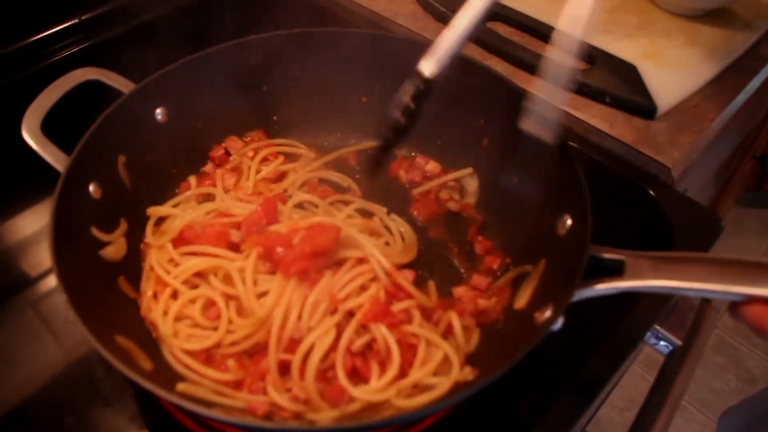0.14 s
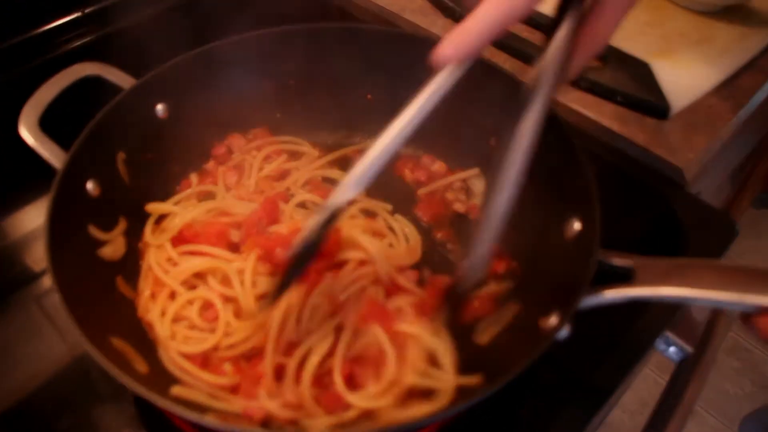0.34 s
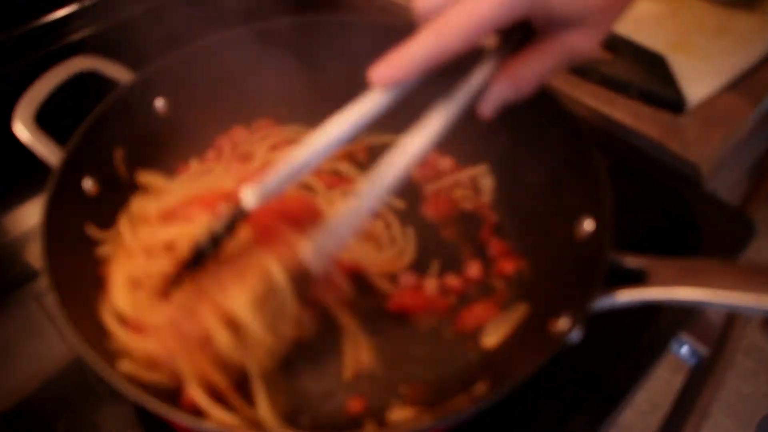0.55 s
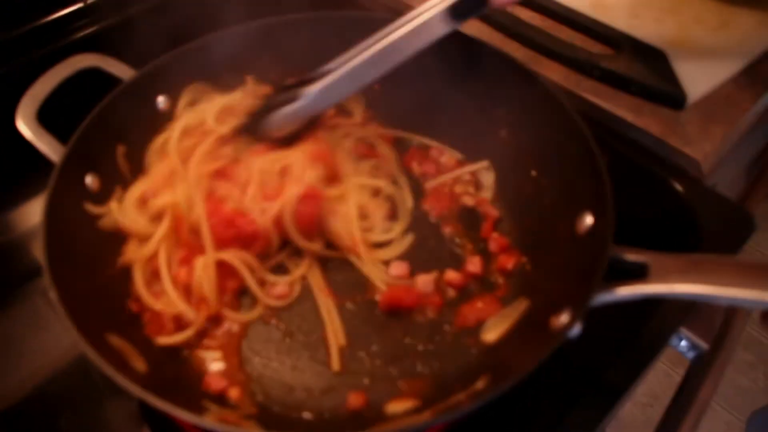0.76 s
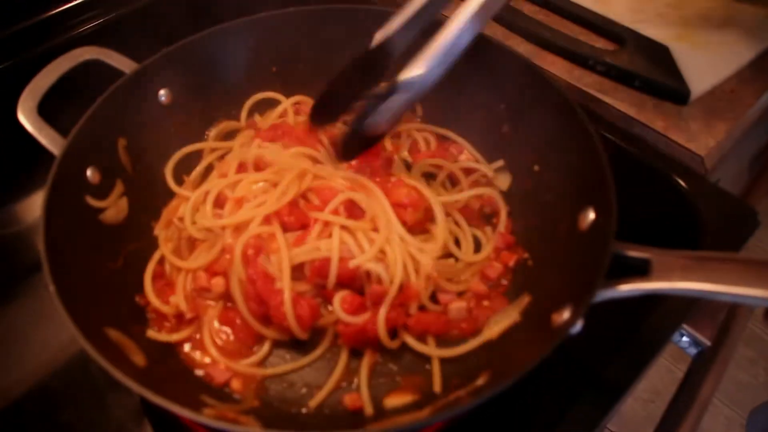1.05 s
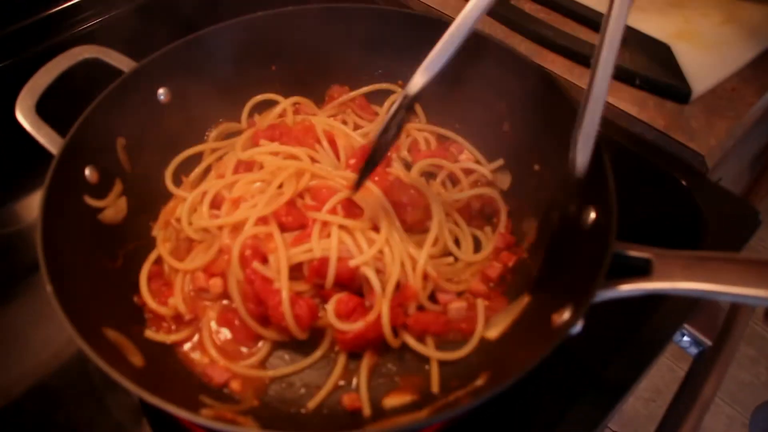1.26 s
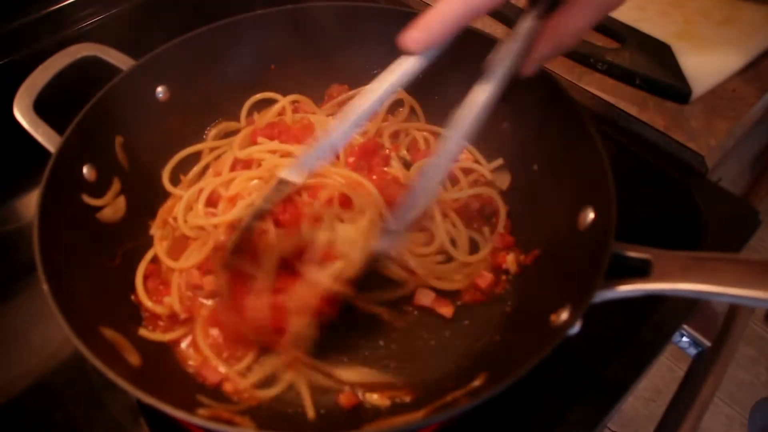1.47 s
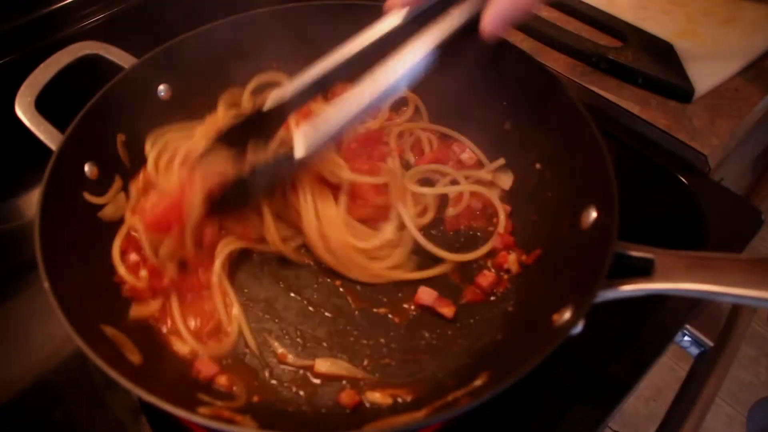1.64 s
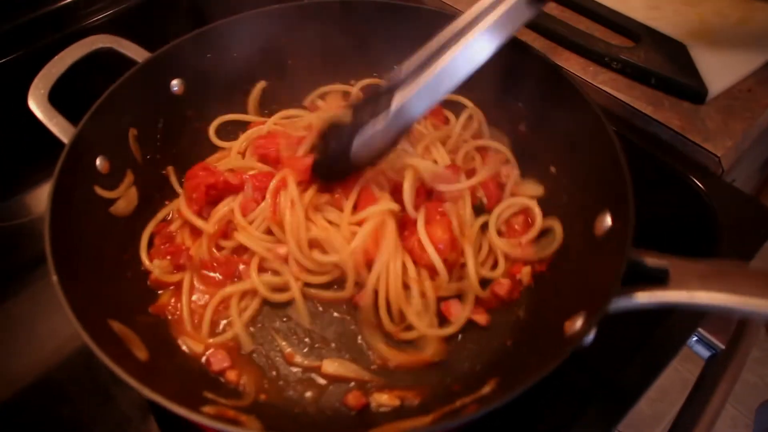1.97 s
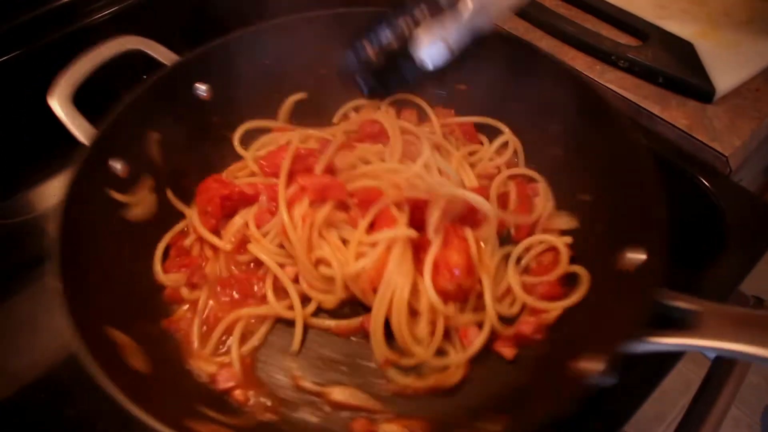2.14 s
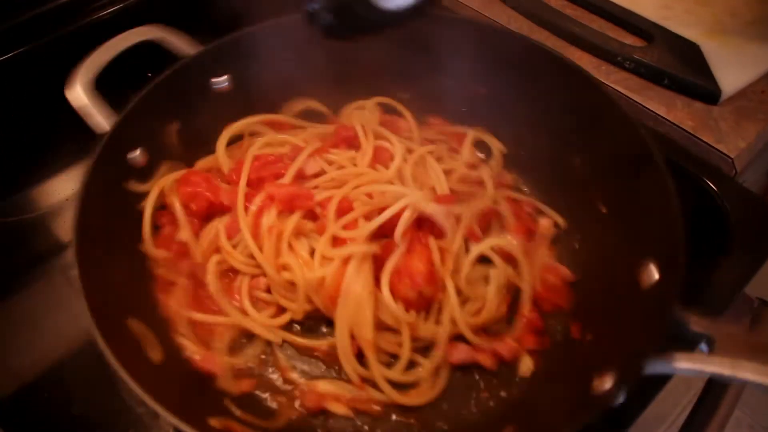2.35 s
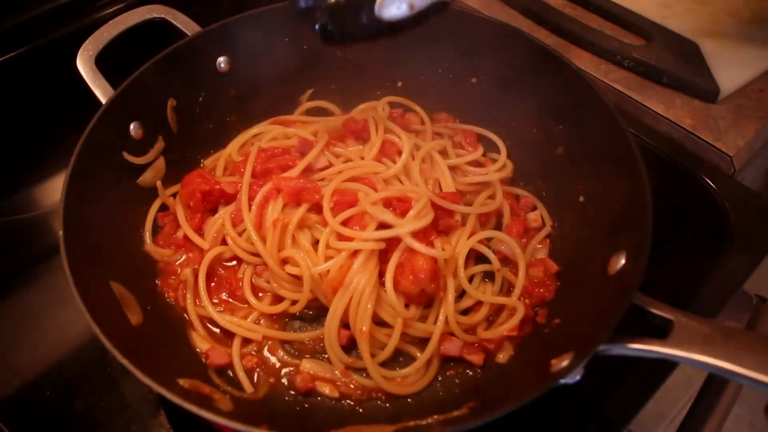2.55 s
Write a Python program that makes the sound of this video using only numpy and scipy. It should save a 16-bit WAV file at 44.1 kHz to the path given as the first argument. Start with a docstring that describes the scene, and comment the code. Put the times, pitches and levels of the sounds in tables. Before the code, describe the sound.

Close above a stove in a small kitchen, tongs strike a pan twice with bright metallic rings, wet spaghetti squelches between, and finally the heavy skillet is shoved, scraping and thumping down over faint sizzling.

```python
"""A small kitchen: steel tongs toss spaghetti in a skillet, over a faint steady sizzle and a low rumble.
Twice the tongs clank on the pan and rebound (hard clacks plus decaying steel modes), then dig into the
wet pasta (sticky grains, soft thuds, wet pops). The skillet is then shoved to and fro over the hob,
scraping (dense slips through the resonances of its base), and knocks back down (dead, coloured blows)."""
import sys
import numpy as np
from scipy import signal
from scipy.fft import rfft, irfft, next_fast_len
from scipy.io import wavfile
from scipy.ndimage import uniform_filter1d

SR = 44100
rng = np.random.default_rng(int(sys.argv[2]) if len(sys.argv) > 2 else 0)


def to_wav(sig):
    """Store sig (one row per channel, or 1-D mono) as 16-bit WAV at the path in sys.argv[1].

    Samples outside -1..1 are clipped; the rate is SR.
    """
    pcm = np.clip(np.atleast_2d(sig), -1, 1) * 32767
    pcm = np.round(pcm).astype(np.int16)
    wavfile.write(sys.argv[1], SR, pcm.T)  # frames by channels


N = 119070


def amp(db):
    """Decibels to gain."""
    return 10 ** (np.asarray(db) / 20)


def unit(x):
    """Scale x to rms 1."""
    return x / np.sqrt(np.mean(x ** 2) + 1e-20)


def along(points, hz):
    """Read a curve of (frequency, value) points on a log frequency axis."""
    f, values = np.transpose(points)
    return np.interp(np.log(hz + 1), np.log(f + 1), values)


def level(points):
    """A gain per sample from (time, level) points, straight in dB."""
    return amp(np.interp(np.arange(N) / SR, *np.transpose(points)))


def coloured(x, shape):
    """Filter x through a curve of dB over frequency, then scale it to rms 1."""
    gain = amp(shape(np.fft.rfftfreq(N, 1 / SR)))
    return unit(irfft(rfft(x) * gain, N))


def noise(spectrum):
    """Noise of a given spectrum."""
    return coloured(rng.standard_normal(N), lambda hz: along(spectrum, hz))


def grains(rate, spread_db):
    """Random tiny impulses of uneven size and either sign, about `rate` a second."""
    hits = rng.random(N) < rate / SR
    signs = rng.choice([-1, 1], N)
    sizes = amp(spread_db * np.clip(rng.standard_normal(N), -2, 2))
    return unit(hits * signs * sizes)


def fade(t60):
    """An exponential decay that falls 60 dB in t60 seconds."""
    return np.exp(-np.log(1000) * np.arange(N) / SR / t60)


def at(s, x):
    """Delay x to start at s seconds."""
    return np.pad(x, (max(round(s * SR), 0), 0))[:N]


def swelling(hz, t60, swell_s):
    """A note that builds up, then dies away."""
    t = np.arange(N) / SR
    return fade(t60) * (1 - np.exp(-t / swell_s)) * np.sin(2 * np.pi * hz * t)


def patchy(x, depth_db):
    """Give x a gain that wanders in time and frequency."""
    cells = signal.stft(x, nperseg=256)[2]
    field = rng.standard_normal(cells.shape)
    field = uniform_filter1d(field, size=3, axis=0)  # smooth over frequency
    field = uniform_filter1d(field, size=7, axis=1)  # smooth over time
    return unit(signal.istft(cells * amp(depth_db * unit(field)))[1][:N])


# reverberation time of the kitchen: (frequency [Hz], t60 [s])
ROOM_DECAY = [(100, 0.41), (400, 0.45), (1500, 0.52), (5000, 0.55), (9000, 0.26), (15000, 0.31)]
# tone of the reverberation: (frequency [Hz], level [dB])
ROOM_TONE = [(100, 5.5), (3000, -0.5), (6000, -3.5), (16000, -5.5)]


def kitchen(x, room_db):
    """Add reverberation: noise that decays at each frequency's own rate, high treble sooner than the rest."""
    hz, t, cells = signal.stft(rng.standard_normal(SR), SR, nperseg=256)
    tone = amp(along(ROOM_TONE, hz))[:, None]
    decay = np.exp(-np.log(1000) * t / along(ROOM_DECAY, hz)[:, None])
    tail = signal.istft(cells * tone * decay, SR)[1]
    tail = tail * (1 - np.exp(-np.arange(len(tail)) / SR / 0.00067))  # soft onset
    return x + amp(room_db) * signal.fftconvolve(x, tail / np.linalg.norm(tail))[:N]


# first reflection off the counter, relative to the snap
COUNTER_ECHO_S, COUNTER_ECHO_DB = 0.0034, -6


def blow(spectrum, tilt, t60, snap_db):
    """A snap, its echo off the counter and a dying rattle, coloured causally so nothing precedes the hit."""
    x = rng.standard_normal(N) * fade(t60)
    x = x / np.linalg.norm(x)
    x[0] += amp(snap_db)
    x[round(COUNTER_ECHO_S * SR)] += amp(snap_db + COUNTER_ECHO_DB)
    # minimum-phase filter: keep only the causal half of the cepstrum
    size = 16384
    hz = np.fft.rfftfreq(size, 1 / SR)
    log_gain = np.log(amp(along(spectrum, hz) + tilt * np.log2(hz + 20)))
    cepstrum = irfft(log_gain)[:size // 2]
    y = irfft(np.exp(2 * rfft(cepstrum, size)) * rfft(x, size))
    # as much energy as 10 ms at rms 1
    return np.pad(y, (0, N - size)) / np.linalg.norm(y) * np.sqrt(SR * .01)


# low rumble of the room: (frequency [Hz], level [dB])
RUMBLE_SPECTRUM = [(18, -7.5), (35, -28.5), (90, -31.5), (300, -34), (1000, -95)]
RUMBLE_DB = -53.5


def rumble():
    """Steady noise, almost all of it in the deep bass."""
    return amp(RUMBLE_DB) * noise(RUMBLE_SPECTRUM)


# tone of the sizzling sauce: (frequency [Hz], level [dB])
SIZZLE_SPECTRUM = [(50, -20), (100, -10), (270, -7), (450, -8), (750, -14.5), (1100, -8), (1600, -16),
                   (2500, -14.5), (3600, -9.5), (4500, -16.5), (5700, -6), (6400, -15.5), (11000, -16.5),
                   (15500, -22.5)]
SIZZLE_DB = -52.5


def sizzle():
    """Countless little bursts in the hot sauce, blurred by the room."""
    bursts = kitchen(grains(rate=2500, spread_db=4), room_db=-1.5)
    return amp(SIZZLE_DB) * coloured(bursts, lambda hz: along(SIZZLE_SPECTRUM, hz))


# how strongly the pasta moves: (time [s], level [dB])
PASTA_MOTION = [(0, -53.5), (0.2, -55.5), (0.42, -46.5), (0.54, -47), (0.62, -53.5), (0.82, -53.5),
                (1.2, -64), (1.48, -46), (1.63, -50), (1.72, -57), (1.88, -57), (2.7, -62)]
# tone of the wet strands: (frequency [Hz], level [dB])
SQUELCH_SPECTRUM = [(80, -28), (250, -10), (700, 2.5), (1150, 6.5), (2000, 1.5), (3500, 2), (6000, 2.5),
                    (8000, -8.5), (16000, -15.5)]
WET_RATE, WET_SPREAD_DB = 1300, 4.3  # grains per second, unevenness
# dull thuds of the pan and the pasta under the tongs: (time [s], level [dB])
THUD_TIMES = [(0.213, -37), (0.269, -35), (0.323, -34), (1.271, -36), (1.322, -39)]
# tone of a thud: (frequency [Hz], level [dB])
THUD_SPECTRUM = [(40, -19), (100, -11.5), (180, -1.5), (290, -3.5), (500, -9), (1500, -31.5)]
THUD_T60, THUD_ATTACK_S = 0.21, 0.0065
# wet pops of the sauce: (time [s], level [dB], centre frequency [Hz])
POP_TIMES = [(0.111, -45, 5000), (0.142, -37, 1880), (0.164, -37.5, 1130), (0.442, -40, 6000),
             (0.496, -48, 4500), (0.507, -38, 5070), (0.524, -39.5, 1120), (0.928, -41.5, 3300),
             (1.519, -35, 3650)]
POP_T60, POP_OCTAVES = 0.014, 0.6  # decay [s]; distance from the centre where a pop is 6 dB down


def pasta():
    """Sticky strands crackle as they move, with soft thuds and a few wet pops."""
    crackle = coloured(grains(WET_RATE, WET_SPREAD_DB), lambda hz: along(SQUELCH_SPECTRUM, hz))
    wet = level(PASTA_MOTION) * crackle
    thud_shape = fade(THUD_T60) * (1 - np.exp(-np.arange(N) / SR / THUD_ATTACK_S))
    thuds = sum(at(s, amp(db) * noise(THUD_SPECTRUM) * thud_shape) for s, db in THUD_TIMES)

    def pop(centre):
        def band(hz):
            octaves = np.log2((hz + 1) / centre)
            return -20 * np.log10(1 + (octaves / POP_OCTAVES) ** 2)
        return coloured(rng.standard_normal(N), band)

    pops = sum(at(s, amp(db) * pop(hz) * fade(POP_T60)) for s, db, hz in POP_TIMES)
    return kitchen(wet + pops, room_db=-12.0) + thuds


# shoves of the pan: (time of top speed [s], half-length [s],
# level before SCRAPE_DB [dB], treble tilt [dB per octave])
PAN_SHOVES = [(2.092, 0.037, -31.5, -0.5), (2.211, 0.032, -24.5, 1), (2.255, 0.0069, -28.5, 0),
              (2.303, 0.0088, -35.5, 11), (2.32, 0.02, -35.5, -3.5), (2.361, 0.026, -27, 1.1),
              (2.474, 0.034, -38, 2.5)]
# broad tone of the scrape: (frequency [Hz], level [dB])
SCRAPE_SPECTRUM = [(60, -47), (150, -11.5), (300, -10.5), (750, -3.5), (1400, -5.5), (2400, -8),
                   (3300, -3.5), (4400, -9.5), (5800, -3), (7500, -9.5), (11000, -12.5), (16000, -24)]
# resonances of the pan's base: (frequency [Hz], width [Hz], lift [dB])
BASE_RESONANCES = [(1860, 83, 7), (2770, 350, 4.5), (3520, 530, 5.5), (5350, 800, 7.5), (6540, 450, 2.5)]
SLIP_RATE, SLIP_SPREAD_DB, SCRAPE_PATCHY_DB = 9000, 2.5, 2  # slips per second, unevenness, patchiness
SCRAPE_DB, SCRAPE_ROOM_DB = 0.5, -13
# the base squeaks just before the heaviest knock
SQUEAK_S, SQUEAK_HALF_S, SQUEAK_DB = 2.364, 0.01, -28.5
SQUEAK_HZ, SQUEAK_WIDTH_HZ = 3626, 170


def scrape():
    """Dense tiny slips of the pan's base excite its resonances at every shove; once one resonance squeaks."""
    t, hz = np.arange(N) / SR, np.fft.rfftfreq(N, 1 / SR)

    def swell(s, half, db):
        return amp(db) * np.exp(-((t - s) / half) ** 2)

    resonances = sum(db / (1 + (2 * (hz - c) / w) ** 2) for c, w, db in BASE_RESONANCES)
    body = along(SCRAPE_SPECTRUM, hz) + resonances
    slips = patchy(grains(SLIP_RATE, SLIP_SPREAD_DB), SCRAPE_PATCHY_DB)
    shoves = np.zeros(N)
    for s, half, db, tilt in PAN_SHOVES:
        shoves += swell(s, half, db) * coloured(slips, lambda f: body + tilt * np.log2(f + 20))

    def squeak_band(f):
        return -20 * np.log10(1 + (2 * (f - SQUEAK_HZ) / SQUEAK_WIDTH_HZ) ** 2)

    squeak = swell(SQUEAK_S, SQUEAK_HALF_S, SQUEAK_DB) * coloured(slips, squeak_band)
    return kitchen(amp(SCRAPE_DB) * shoves + squeak, SCRAPE_ROOM_DB)


# skillet knocking on the hob: (time [s], level [dB], treble tilt [dB per octave])
KNOCK_TIMES = [(2.224, -21.5, -1.3), (2.271, -25, -1), (2.3926, -15.5, 0.5), (2.4283, -29, -2),
               (2.437, -29.5, 0.1), (2.483, -41, -1.5)]
# tone of a knock: (frequency [Hz], level [dB])
KNOCK_SPECTRUM = [(30, -44), (55, -19), (85, -2), (150, -1), (210, 1.5), (450, 1.5), (800, -5.5),
                  (1300, -8), (2200, -15), (4200, -17), (5600, -13), (8000, -23), (16000, -32.5)]
KNOCK_T60, KNOCK_SNAP_DB, KNOCK_ROOM_DB = 0.057, -6.5, -14


def knocks():
    """The loaded skillet lands on the hob with a dead, heavy knock and rattles."""
    out = np.zeros(N)
    for s, db, tilt in KNOCK_TIMES:
        knock = amp(db) * blow(KNOCK_SPECTRUM, tilt, KNOCK_T60, KNOCK_SNAP_DB)
        out += at(s, kitchen(knock, KNOCK_ROOM_DB))
    return out


# tongs on the pan: (time [s], ring level [dB], clack level [dB], clack t60 [s],
# treble tilt [dB per octave], spot struck [0-2])
TONG_CONTACTS = [(0.2125, 0, -10.5, 0.031, 0.15, 0), (0.252, -14, -30, 0.044, 1.5, 2),
                 (1.2688, -1, -12.5, 0.047, -0.6, 1), (1.306, -5, -17.5, 0.055, -0.95, 2)]
# ringing of tongs and pan, before ring level and tilt: (frequency [Hz], t60 [s],
# level at spot 0 [dB], level at spot 1 [dB], level at spot 2 [dB])
STEEL_MODES = [(388, .35, -24, -29, -42), (981, .34, -34, -22, -40), (1126, .33, -26, -27, -42),
               (1363, .4, -26, -24, -46), (1443, .32, -30, -37, -36), (1809, .42, -46, -30, -50),
               (1842, .42, -30, -41, -44), (1916, .21, -26, -42, -44), (2116, .35, -37, -18.5, -56),
               (2434, .24, -33, -33, -42), (2625, .26, -32, -34, -44), (2950, .25, -23, -54, -52),
               (3021, .36, -46, -28.5, -54), (3476, .26, -25, -43, -42), (3540, .31, -27, -36, -28),
               (3591, .22, -32, -28, -25), (4188, .31, -33, -35, -34), (4935, .12, -25, -26, -45),
               (5303, .17, -28, -38, -40), (5421, .15, -38, -38, -27), (6000, .17, -27, -38, -37),
               (6350, .08, -25, -31, -24), (8000, .16, -39, -41, -40)]
# tone of a clack: (frequency [Hz], level [dB])
CLACK_SPECTRUM = [(60, -32), (180, -12), (400, -5.5), (760, -6.5), (1100, 3), (2600, -4), (3700, 1),
                  (4600, 1), (6200, 5), (7500, -5.5), (12000, -13), (16000, -27)]
# the pan's deep note, before ring level: (level at spot 0 [dB], at spot 1 [dB], at spot 2 [dB])
BOWL_LEVELS = [-19.5, -15, -55]
BOWL_HZ, BOWL_T60, BOWL_SWELL_S = 627.6, 0.58, 0.22
# the hob hums under a struck pan; its level also follows the ring level
HOB_HZ, HOB_T60, HOB_SWELL_S, HOB_DB = 154, 0.68, 0.066, -41.5
# crowd of weak upper modes: range [Hz], mean t60 [s], level of each before ring level [dB]
SHIMMER_LOW_HZ, SHIMMER_HIGH_HZ, SHIMMER_T60, SHIMMER_DB = 1700, 7500, 0.06, -40
TILT_PIVOT_HZ, RING_ROOM_DB = 2000, -19
CLACK_SNAP_DB, CLACK_ROOM_DB = -7, -16.5


def ringing(tilt, spot):
    """One second of decaying steel modes; the spot struck decides which speak."""
    t, ring = np.arange(SR) / SR, np.zeros(SR)

    def mode(hz, t60, db):
        return amp(db - 60 * t / t60) * np.sin(2 * np.pi * hz * t)

    # alternate signs keep the modes from all starting in step
    for k, (hz, t60, *spot_db) in enumerate(STEEL_MODES):
        ring += (-1) ** k * mode(hz, t60, spot_db[spot] + tilt * np.log2(hz / TILT_PIVOT_HZ))
    for k, (place, length) in enumerate(rng.random(size=(24, 2))):
        hz = np.interp(place, [0, 1], [SHIMMER_LOW_HZ, SHIMMER_HIGH_HZ])
        ring += (-1) ** k * mode(hz, SHIMMER_T60 * (.5 + length), SHIMMER_DB)
    return np.pad(ring, (0, N - SR))


def tongs():
    """Each contact is a hard clack that sets the steel, the pan's deep note and the hob ringing."""
    out = np.zeros(N)
    for s, ring_db, clack_db, clack_t60, tilt, spot in TONG_CONTACTS:
        spot = int(round(spot))
        ring = kitchen(ringing(tilt, spot), RING_ROOM_DB)
        bowl = amp(BOWL_LEVELS[spot]) * swelling(BOWL_HZ, BOWL_T60, BOWL_SWELL_S)
        hob = amp(HOB_DB) * swelling(HOB_HZ, HOB_T60, HOB_SWELL_S)
        clack = amp(clack_db) * blow(CLACK_SPECTRUM, tilt, clack_t60, CLACK_SNAP_DB)
        out += at(s, amp(ring_db) * (ring + bowl + hob) + kitchen(clack, CLACK_ROOM_DB))
    return out


def scene():
    """Everything at one microphone above the stove."""
    return (rumble() + sizzle() + pasta() + scrape() + knocks() + tongs())[None]


CLIP_LEVEL, TOP_HZ = 0.92, 15900


def record(dry):
    size = next_fast_len(N + SR // 2)
    clipped = np.clip(dry, -CLIP_LEVEL, CLIP_LEVEL)
    kept = np.fft.rfftfreq(size, 1 / SR) < TOP_HZ
    return irfft(rfft(clipped, size) * kept, size)[..., :N]


dry = scene()
out = record(dry)
to_wav(out)
```